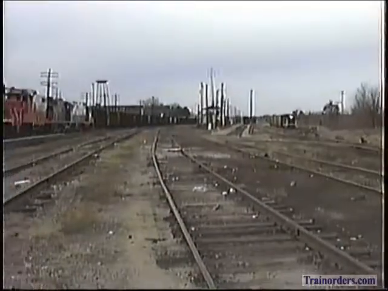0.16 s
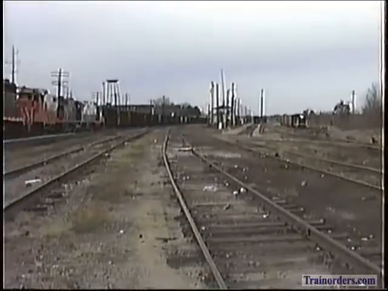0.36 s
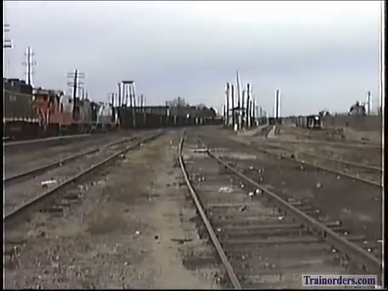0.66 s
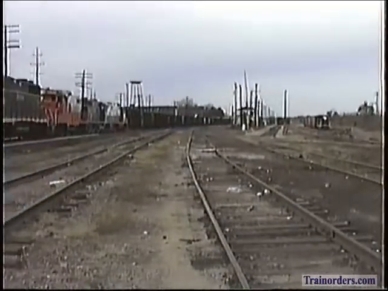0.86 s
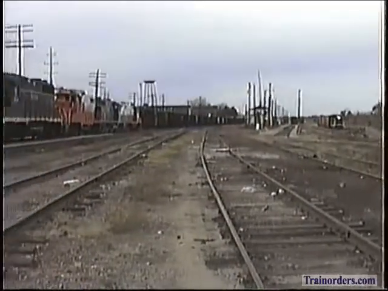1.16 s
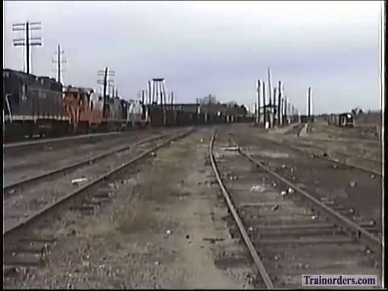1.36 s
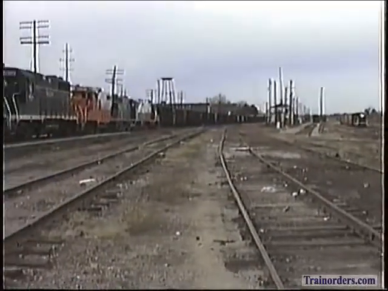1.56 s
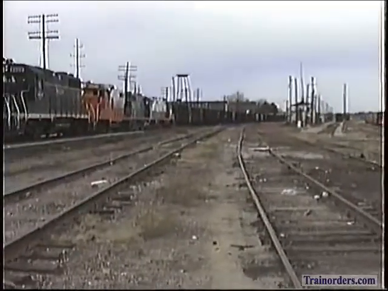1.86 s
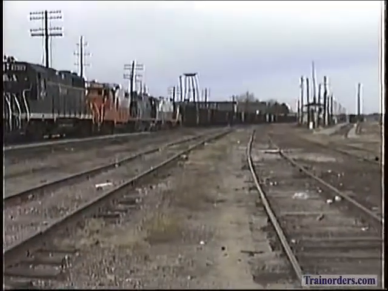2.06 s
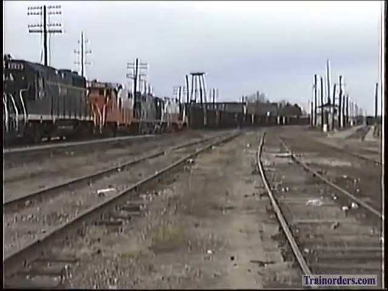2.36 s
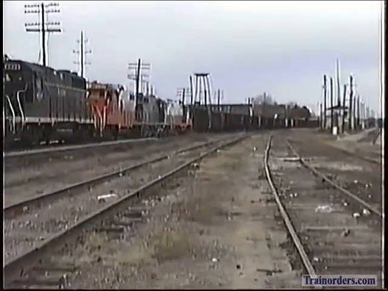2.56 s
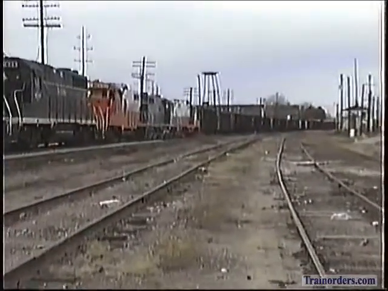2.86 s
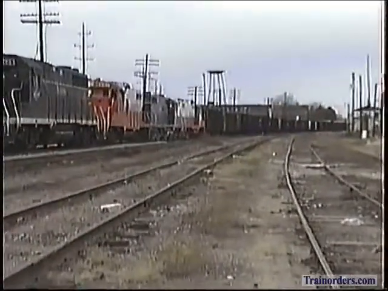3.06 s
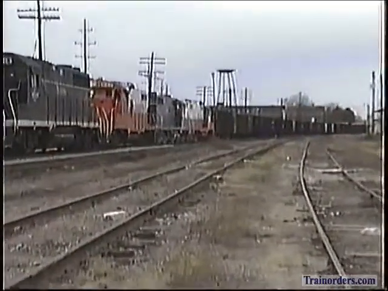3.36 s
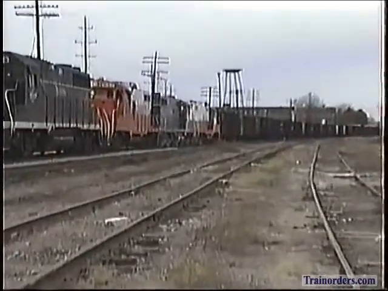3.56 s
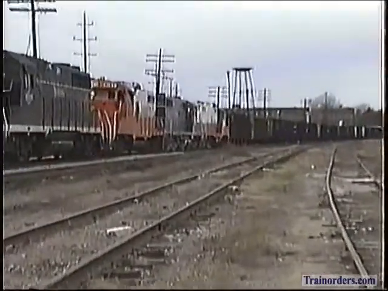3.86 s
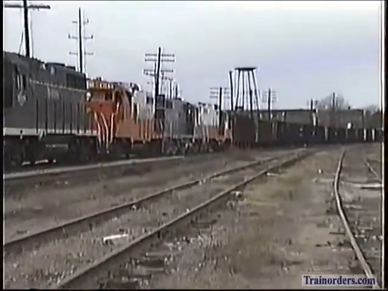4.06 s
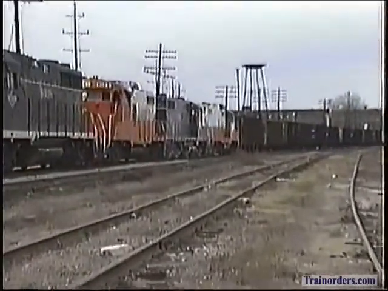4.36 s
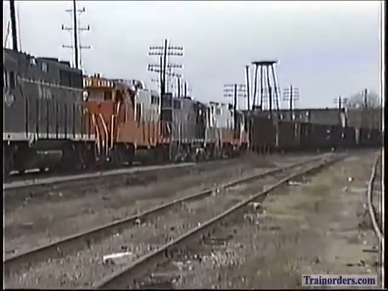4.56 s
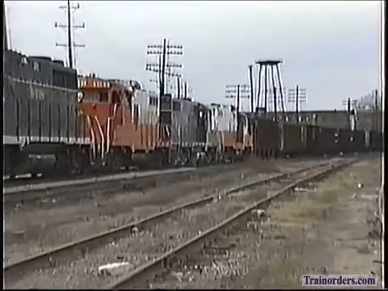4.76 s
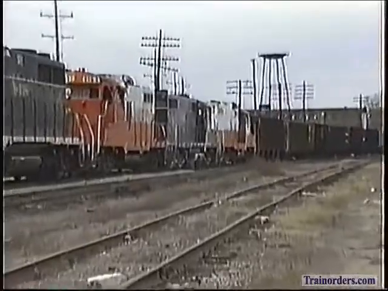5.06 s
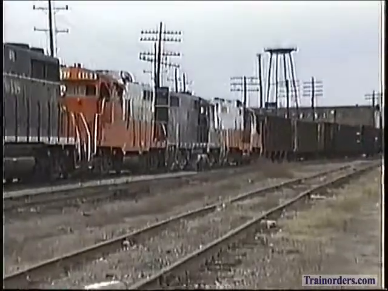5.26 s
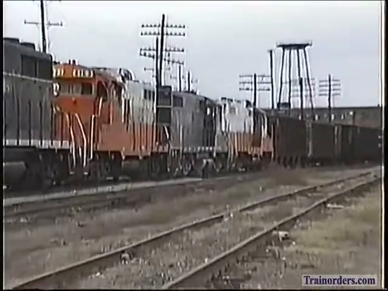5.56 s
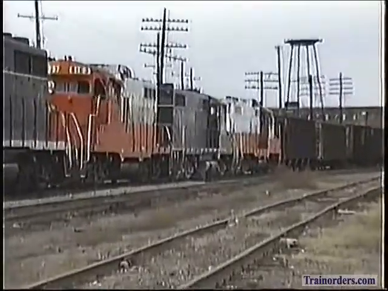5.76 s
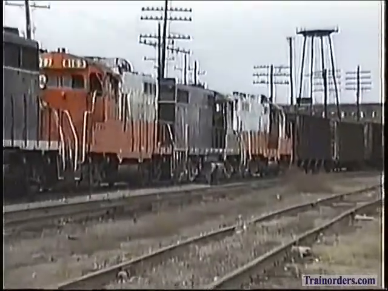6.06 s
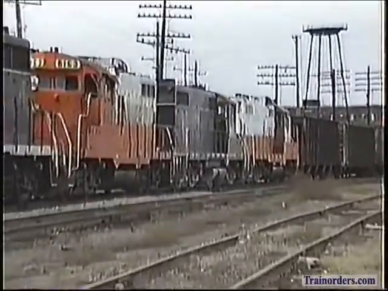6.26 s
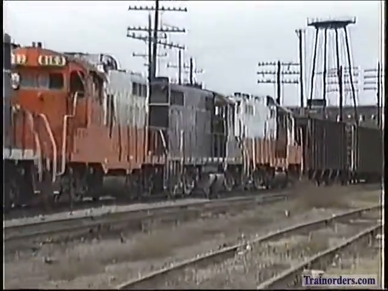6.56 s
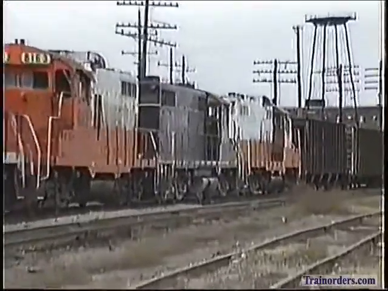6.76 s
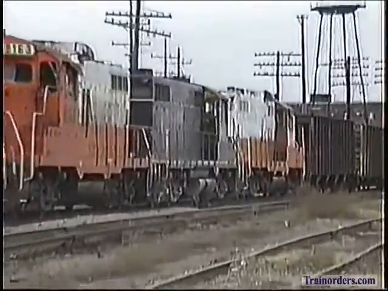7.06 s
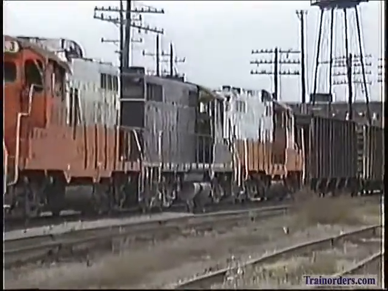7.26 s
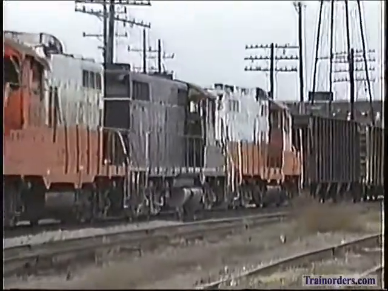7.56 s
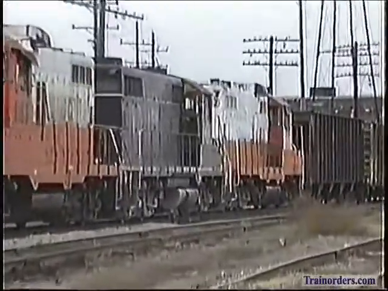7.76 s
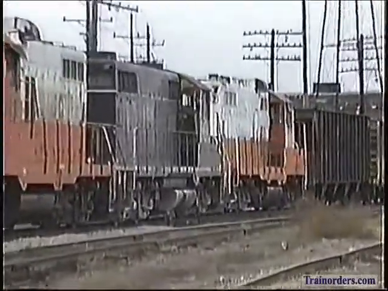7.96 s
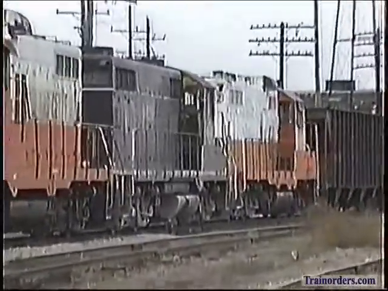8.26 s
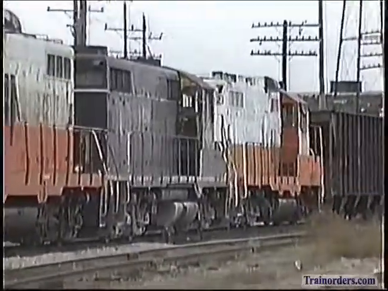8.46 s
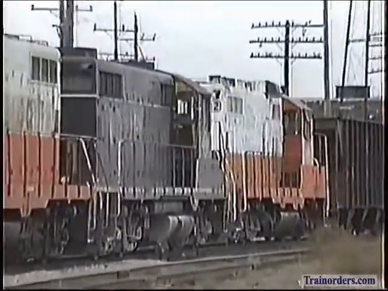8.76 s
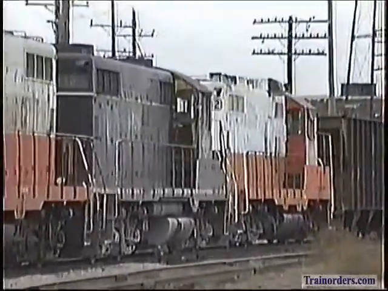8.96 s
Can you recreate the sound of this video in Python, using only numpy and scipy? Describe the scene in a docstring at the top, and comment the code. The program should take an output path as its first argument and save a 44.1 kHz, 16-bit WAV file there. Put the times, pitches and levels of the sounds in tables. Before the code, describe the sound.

Gusts of wind bump against a microphone in an open rail yard as a freight train's diesel engines approach. Their pulsing rumble carries a thin whine, fast ticking and small rhythmic squeaks over a faint hiss. After an early rise the engine sound suddenly falls back, then steadily grows closer, the squeaks and steel rasps more prominent, until the low exhaust swells as a locomotive draws alongside.

```python
"""A string of two-stroke diesel locomotives rolls slowly through a rail yard toward the listener.
Gusts thump the microphone from the start, over a faint hiss. Each sixteen-cylinder engine repeats its
firing pattern every crank turn under whining timing gears; the nearest rattles, rasps and squeaks in step.
The gear whine swells briefly at 2.5 s, then the train's level drops abruptly. From 4 s it builds as the
engines draw near, and at the very end the deep exhaust swells as the next one comes alongside."""
import sys
import numpy as np
from scipy import signal
from scipy.fft import rfft, irfft, next_fast_len
from scipy.io import wavfile
from scipy.ndimage import uniform_filter1d, map_coordinates

SR = 44100
rng = np.random.default_rng(int(sys.argv[2]) if len(sys.argv) > 2 else 0)


def store_pcm(level_fs):
    """Save levels as 16-bit WAV."""
    pcm = np.round(np.clip(level_fs, -1, 1) * 32767).astype(np.int16)
    wavfile.write(sys.argv[1], SR, np.atleast_2d(pcm).T)


N = 402633

# tone of the hiss bed: (frequency [Hz], relative level [dB])
HISS_SPECTRUM = [(1500, 2), (5000, -2.5), (8300, -2.5), (11000, -4.5), (13500, -13)]
# wind rumble on the microphone: (frequency [Hz], relative level [dB])
RUMBLE_SPECTRUM = [(15, -36), (24, -39), (33, -3.5), (48, 2.5), (70, 1), (110, -3.5), (160, -11.5),
                   (250, -22.5), (400, -28.5), (900, -88)]
# small eddies in the wind: (frequency [Hz], relative level [dB])
EDDY_SPECTRUM = [(60, -19), (130, -1), (200, 3.5), (300, -12), (600, -39), (1200, -100)]
# gusts: (time [s], peak level [dB], half length [s], eddies against the rumble [dB])
GUSTS = [(0.01, -29, 0.04, -13), (0.085, -19.5, 0.045, -9.5), (0.165, -27, 0.038, -12),
         (1.08, -24, 0.15, -12.5), (1.488, -30, 0.055, -25), (2.165, -26, 0.13, -11),
         (2.597, -31, 0.022, -4), (2.82, -22.5, 0.17, -14), (3.098, -26, 0.022, -18),
         (3.253, -29.5, 0.21, -24), (3.587, -21.5, 0.05, -24), (3.91, -26, 0.064, -13.5),
         (5.106, -18.5, 0.02, -16), (5.558, -32, 0.12, -18), (6.33, -32.5, 0.2, -30),
         (7.07, -25.5, 0.028, -10), (8.8, -32, 0.29, -11)]
BREEZE_DB, BREEZE_RISE_DB_PER_S = -33, 0.2  # the wind between gusts freshens slowly

# high flange squeals, and one swell of the gear whine near 1.1 kHz:
# (time [s], pitch [Hz], peak level [dB], half length [s], pitch jitter [Hz])
BRIEF_TONES = [(2.0, 4620, -65, 0.04, 45), (2.48, 1084, -44, 0.035, 8.7), (4.33, 2370, -57, 0.13, 10.4),
               (6.41, 4640, -64, 0.05, 45), (6.97, 4630, -64, 0.1, 40), (8.7, 4620, -61, 0.04, 45)]
# squeaks that stand out: (time [s], peak level [dB])
LOUD_SQUEAKS = [(0.41, -43), (1.493, -48), (1.713, -45), (1.933, -46.5), (2.799, -44), (3.019, -50),
                (3.451, -48), (3.887, -51), (4.105, -46), (4.323, -49.5), (4.755, -46.5), (6.063, -45.5),
                (6.279, -43), (6.495, -42), (7.364, -42), (7.582, -45), (7.802, -42), (8.017, -40.5),
                (8.237, -41.5), (8.883, -42)]
SQUEAK_HZ = 2105
# harder rasps of loose steel: (time [s], peak level [dB], half length [s])
HARD_RASPS = [(0.658, -53, 0.015), (1.838, -50, 0.019), (2.706, -46, 0.02), (5.529, -48.5, 0.016),
              (5.75, -47, 0.012), (5.966, -44.5, 0.016), (6.187, -47, 0.018), (6.398, -46, 0.018),
              (7.17, -51, 0.015), (7.265, -49, 0.016), (7.487, -45.5, 0.016), (7.924, -48, 0.018),
              (8.14, -50, 0.018), (8.366, -47, 0.016), (9.004, -45, 0.019)]
# tone of a rasp: (frequency [Hz], relative level [dB])
RASP_SPECTRUM = [(1200, 2.5), (2400, 3), (3200, -1), (4200, -4.5), (5500, -13), (9000, -22)]
# ring of the loose steel: (frequency [Hz], width [Hz], lift [dB])
STEEL_RESONANCES = [(2740, 200, 3), (3290, 260, 7.5), (3630, 110, 4), (4300, 200, 2)]
# tone of the valve gear and injectors: (frequency [Hz], relative level [dB])
RATTLE_SPECTRUM = [(1000, -10), (2000, -5.5), (2500, -1), (3300, -2), (4100, -6.5), (4480, -9.5),
                   (4620, -5.5), (4780, -11.5), (6500, -16), (8400, -17.5), (10000, -21.5), (12400, -22),
                   (13700, -24)]
# fader on the rattle: (time [s], level against the train [dB])
RATTLE_FADER = [(0, -20), (2.4, -19), (4.4, -18), (7.15, -20.5), (7.3, -19), (9.13, -18.5)]
# gear mesh, one row an engine: (harmonic 2 [dB], ..., harmonic 7 [dB])
GEAR_HARMONICS = [
    [-9, 0, 1.1, -7, -10.5, -15],
    [-9, -20, -8, -31, -18, -18],
    [-6, -16, -9, -31, -13, -44],
]
# fader on the whine, which sinks into the growing roar: (time [s], gain against the train [dB])
WHINE_FADER = [(0, -17.5), (2.5, -16), (3.2, -15.5), (5.3, -18), (7, -19.5), (9.13, -18)]

# the engines, nearest first: (crank speed [turns/s], relative exhaust level [dB])
ENGINES = [(4.599, 0), (4.768, -5), (4.555, -6)]
CYLINDERS, GEAR_TEETH = 16, 79
# drone partials that the stacks and hood favour: (crank order [cycles/turn])
DRONE_ORDERS = [16, 32, 40, 48, 60, 66, 79, 85, 87, 93, 97, 105, 117, 129, 131, 141, 150, 151, 152, 156,
                158, 161, 174, 179, 246, 332, 339, 411]
# balance of those partials: (relative level [dB])
DRONE_LEVELS = [-18, -26, -21, -14.5, -17.5, -21.5, -12, -20.5, -18, -19, -18.5, -20.5, -15.5, -18, -17.5,
                -19.5, -18.5, -11, -20, -19.5, -21, -11.5, -19, -22, -33, -28, -33, -35.5]
DRONE_BLUR_CYCLES, DRONE_BLUR_PER_S = 0.064, 30  # moving air smears the drone's phase
# body of the stacks and hoods: (frequency [Hz], width [Hz], lift [dB])
HOOD_RESONANCES = [(352, 22, -3), (385, 30, 3), (444, 89, -2), (589, 54, 3.5), (729.6, 46, 5.5),
                   (890, 110, 1.5), (1135, 150, 1.5), (1280, 510, -0.5), (2240, 200, -0.5)]
# midrange roar of the exhaust: (frequency [Hz], relative level [dB])
ROAR_SPECTRUM = [(150, -13.5), (270, -11.5), (370, -4.5), (450, -7.5), (520, -4.5), (600, -6.5), (730, -7),
                 (880, -13.5), (1150, -13), (1600, -20.5), (2100, -19.5), (2600, -32), (4000, -52.5)]
# low end of the exhaust: (frequency [Hz], relative level [dB])
DEEP_SPECTRUM = [(35, -6), (70, -2.5), (110, 3.5), (180, 2.5), (250, -4), (305, 0.5), (350, -13),
                 (500, -31), (900, -69)]
# fader on the train: it builds, drops abruptly, and builds as the engines near: (time [s], level [dB])
TRAIN_FADER = [(0, -34), (0.2, -37), (0.6, -35), (2.3, -32), (2.41, -31), (2.745, -31), (2.775, -35),
               (3.13, -37.5), (3.8, -37), (4.7, -34), (7.2, -30.5), (8.15, -28.5), (9.13, -28.5)]
ROAR_DB, DRONE_DB, DEEP_DB, RASP_DB, SQUEAK_DB = -0.76, -1, -2.5, -19.5, -16  # trims on that fader
DIP_S, DIP_HALF_S, DIP_DB = 0.293, 0.011, -3.5  # the level dips briefly
ABREAST_S, ABREAST_HALF_S, ABREAST_DB = 9.2, 0.28, 6.5  # low-end swell as the next engine comes alongside

# diffuse difference between the channels: (frequency [Hz], side against mid [dB])
STEREO_WIDTH = [(40, -40), (150, -36), (300, -24), (700, -25), (1500, -18.5), (2500, -17), (4300, -13),
                (8000, -31.5), (12000, -15)]
# gain imbalance of the two channels: (frequency [Hz], side against mid [dB])
CHANNEL_LEAN = [(40, -18.5), (150, -18), (1000, -19), (2200, -17.5), (3500, -18), (6000, -38)]
TOP_HZ = 13800


def amp(db):
    """Decibels to gain."""
    return 10 ** (np.asarray(db) / 20)


def unit(x):
    """x at rms 1."""
    return x / np.sqrt(np.mean(x ** 2) + 1e-20)


def eq_gain(points, hz):
    """Gain of a (frequency [Hz], level [dB]) curve, drawn on a log frequency axis."""
    frequencies, db = np.transpose(points)
    return amp(np.interp(np.log(hz + 1), np.log(frequencies + 1), db))


def fader(points):
    """A (time [s], level [dB]) fader ride as dB per sample."""
    return np.interp(np.arange(N) / SR, *np.transpose(points))


def wobble(rate):
    """A smooth random curve, rate knots a second."""
    return map_coordinates(rng.standard_normal(int(N * rate / SR) + 4), [np.arange(N) * rate / SR])


def filtered(x, response):
    """x through a frequency response."""
    size = next_fast_len(N + SR // 2)
    return irfft(rfft(x, size) * response(np.fft.rfftfreq(size, 1 / SR)), size)[..., :N]


def coloured(x, spectrum):
    """x through an EQ curve, at rms 1."""
    return unit(filtered(x, lambda hz: eq_gain(spectrum, hz)))


def resonant(x, resonances):
    """x through the peaks and dips of a resonant body."""
    lift_db = lambda hz: sum(db / (1 + (2 * (hz - centre) / width) ** 2) for centre, width, db in resonances)
    return filtered(x, lambda hz: amp(lift_db(hz)))


def steady(x, window_s):
    """x with its own slow swells evened out."""
    power = np.abs(uniform_filter1d(x ** 2, max(int(window_s * SR), 1)))
    return x / np.sqrt(power + 1e-6)


def swell(centre_s, half_s):
    """A bell-shaped envelope; its half length is one standard deviation."""
    return np.exp(-.5 * ((np.arange(N) / SR - centre_s) / half_s) ** 2)


def tone(turns, order):
    """A sine of rms 1, order cycles to the turn."""
    return np.sqrt(2) * np.sin(2 * np.pi * (order * turns + rng.random()))


def crank(speed, hunt_turns):
    """Crank angle in turns; the governor hunts slightly around its set speed."""
    return speed * np.arange(N) / SR + hunt_turns * wobble(1.5)


def each_turn(turns, at, half_s, scatter_db):
    """A bell-shaped burst at the same point of every crank turn, varying in strength."""
    phase = turns - at + .5
    strengths = amp(scatter_db * rng.uniform(-1, 1, size=64))
    strength = strengths[np.floor(phase).astype(int) % len(strengths)]
    seconds_off = (phase % 1 - .5) / ENGINES[0][0]
    return strength * np.exp(-.5 * (seconds_off / half_s) ** 2)


def hiss():
    """A steady bed of bright noise."""
    return coloured(rng.standard_normal(N), HISS_SPECTRUM)


def stereo_spread(sound, decay_s):
    """A faint diffuse difference between the channels that slightly widens the sound."""
    tail = rng.standard_normal(SR // 5) * np.exp(-np.arange(SR // 5) / SR / decay_s)
    diffuse = signal.fftconvolve(sound, tail / np.linalg.norm(tail))[:N]
    return filtered(diffuse, lambda hz: eq_gain(STEREO_WIDTH, hz))


def wind(restless_db, breeze_eddy_db):
    """A restless breeze and gusts rumble on the microphone and shed small eddies."""
    breeze = amp(BREEZE_DB + BREEZE_RISE_DB_PER_S * np.arange(N) / SR + restless_db * wobble(5.4))
    gusts = [(amp(db) * swell(s, half_s), eddy_db) for s, db, half_s, eddy_db in GUSTS]
    blows = [(breeze, breeze_eddy_db)] + gusts
    force = np.sqrt(sum(blow ** 2 for blow, _ in blows))
    swirl = np.sqrt(sum((amp(eddy_db) * blow) ** 2 for blow, eddy_db in blows))
    flow = lambda spectrum: steady(coloured(rng.standard_normal(N), spectrum), window_s=0.117)
    return force * flow(RUMBLE_SPECTRUM) + swirl * flow(EDDY_SPECTRUM)


def brief_tones():
    """Short unsteady tones: wheel flanges sing high on the rail, and the gear whine swells once."""
    out = np.zeros(N)
    for s, hz, db, half_s, jitter_hz in BRIEF_TONES:
        cycles = np.cumsum(hz + jitter_hz * wobble(200)) / SR
        out += amp(db) * swell(s, half_s) * tone(cycles, 1)
    return out


def squeaks(turns, level_db, at, jitter_hz, half_s, roughness):
    """A dry part rubs at the same point of every turn: short scratchy pips, some louder than the rest."""
    cycles = np.cumsum(SQUEAK_HZ + jitter_hz * wobble(500)) / SR
    pip = unit(np.sin(2 * np.pi * cycles) * (1 + roughness * wobble(260)))
    usual = amp(level_db) * each_turn(turns, at, half_s, scatter_db=0.5)
    loud = sum(amp(db) * swell(s, half_s) for s, db in LOUD_SQUEAKS)
    return pip * np.maximum(usual, loud)


def steel_rasps(turns, level_db, at, half_s, grit_db):
    """Loose steel gives a short gritty, ringing rasp once a turn, now and then a harder one."""
    usual = amp(level_db) * each_turn(turns, at, half_s, scatter_db=4.5)
    hard = sum(amp(db) * swell(s, hard_half_s) for s, db, hard_half_s in HARD_RASPS)
    grit = amp(grit_db * wobble(300)) * rng.standard_normal(N)
    return np.maximum(usual, hard) * coloured(resonant(grit, STEEL_RESONANCES), RASP_SPECTRUM)


def rattle(turns, at, half_turns, onbeat, offbeat):
    """Valve gear and injectors: dense ticking that swells once a turn and again half a turn later."""
    bump = lambda centre: np.exp(-.5 * (((turns - centre + .5) % 1 - .5) / half_turns) ** 2)
    beat = 1 + onbeat * bump(at) + offbeat * bump(at + .5)
    mesh = 1 + 0.055 * tone(turns, GEAR_TEETH)  # every tooth contact adds a little grit
    ticking = firings(turns, fade=0.15, uneven_db=1.24, turbulence=2.2)
    return coloured(beat * mesh * ticking, RATTLE_SPECTRUM)


def gear_whine(cranks, waver_db, backlash_teeth, runout_db, tightest_at):
    """Timing gears sing at harmonics of their tooth rate, loudest where they mesh tightest in a turn."""
    out = np.zeros(N)
    for turns, levels in zip(cranks, GEAR_HARMONICS):
        teeth = GEAR_TEETH * turns + backlash_teeth * wobble(25)  # play blurs the upper harmonics
        mesh_db = runout_db * np.cos(2 * np.pi * (turns - tightest_at))
        for harmonic, db in enumerate(levels, 2):
            out += amp(db + mesh_db + waver_db * wobble(14)) * tone(teeth, harmonic)
    return out


def lope(turns, weak_at, weak_db, strong_at, strong_db, half_s):
    """Gain of the uneven beat: a few weak firings in each turn, then a strong one."""
    sag_db = weak_db * each_turn(turns, weak_at, half_s, scatter_db=-2)
    accent_db = strong_db * each_turn(turns, strong_at, half_s / 2, scatter_db=-3)
    return amp(sag_db + accent_db)


def drone(turns, waver_db, flutter_db):
    """Strong crank orders of the nearest engine, each wavering in level and phase in the moving air."""
    out = np.zeros(N)
    for order, db in zip(DRONE_ORDERS, DRONE_LEVELS):
        gain = amp(db + waver_db * wobble(2.59) + flutter_db * wobble(14))
        cycles = order * turns + DRONE_BLUR_CYCLES * wobble(DRONE_BLUR_PER_S)
        out += gain * tone(cycles, 1)
    return out


def firings(turns, fade, uneven_db, turbulence):
    """Each cylinder blows its own dying puff, alike on every turn but for some fresh turbulence."""
    slot = turns % 1 * CYLINDERS
    strength = amp(uneven_db * rng.standard_normal(CYLINDERS))[slot.astype(int) % CYLINDERS]
    envelope = strength * np.exp(-fade * (slot % 1))
    one_turn = rng.standard_normal(SR // 5)
    looped = unit(np.interp(turns % 1, np.linspace(0, 1, len(one_turn)), one_turn))
    return unit(envelope * (looped + turbulence * rng.standard_normal(N)))


def exhaust(cranks, spectrum, turbulence):
    """The firings of all engines roar through their stacks and hoods."""
    puffs = sum(amp(db) * firings(turns, fade=0.54, uneven_db=0.48, turbulence=turbulence)
                for turns, (_, db) in zip(cranks, ENGINES))
    return coloured(resonant(puffs, HOOD_RESONANCES), spectrum)


def scene():
    """The mix: engines, wheels, wind and hiss in the centre, with a slight stereo spread."""
    train_db = fader(TRAIN_FADER) + DIP_DB * swell(DIP_S, DIP_HALF_S)
    deep_db = train_db + DEEP_DB + ABREAST_DB * swell(ABREAST_S, ABREAST_HALF_S)
    whine_db = train_db + fader(WHINE_FADER)
    rattle_db = train_db + fader(RATTLE_FADER)
    cranks = [crank(speed, hunt_turns=0.00094) for speed, _ in ENGINES]
    nearest = cranks[0]
    # every "at" is a point in the crank's turn, from 0 to 1
    beat = lope(nearest, weak_at=0.68, weak_db=-2.5, strong_at=1.0, strong_db=2.2, half_s=0.026)
    mid = amp(train_db + ROAR_DB) * exhaust(cranks, ROAR_SPECTRUM, turbulence=1.3)
    mid += amp(deep_db) * exhaust(cranks, DEEP_SPECTRUM, turbulence=1.46)
    mid += amp(train_db + DRONE_DB) * beat * drone(nearest, waver_db=1.8, flutter_db=1.6)
    whine = gear_whine(cranks, waver_db=0.9, backlash_teeth=0.016, runout_db=0.6, tightest_at=0.52)
    mid += amp(whine_db) * whine
    mid += amp(rattle_db) * rattle(nearest, at=0.505, half_turns=0.046, onbeat=0.18, offbeat=0.27)
    mid += steel_rasps(nearest, train_db + RASP_DB, at=0.42, half_s=0.019, grit_db=2.5)
    mid += squeaks(nearest, train_db + SQUEAK_DB, at=0.94, jitter_hz=59.5, half_s=0.0091, roughness=0.77)
    mid += brief_tones()
    mid += wind(restless_db=1.5, breeze_eddy_db=-12)
    mid += amp(-59.0) * hiss()
    side = stereo_spread(mid, decay_s=0.046)
    return np.array([mid + side, mid - side])


def record(dry):
    """Two slightly unequal channels, band-limited and resting on a constant voltage offset."""
    corner_hz, offset = 125, .123
    # the left channel takes a little more below the corner, the right a little more above it
    lean = lambda hz: eq_gain(CHANNEL_LEAN, hz) * (corner_hz - 1j * hz) / (corner_hz + 1j * hz)
    return offset + filtered(dry, lambda hz: (1 + np.outer([1, -1], lean(hz))) * (hz < TOP_HZ))


dry = scene()
out = record(dry)
store_pcm(out)
```